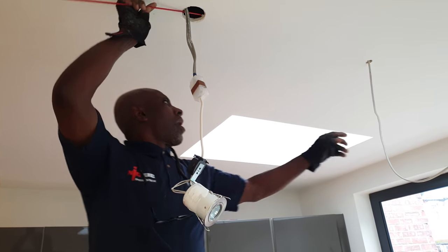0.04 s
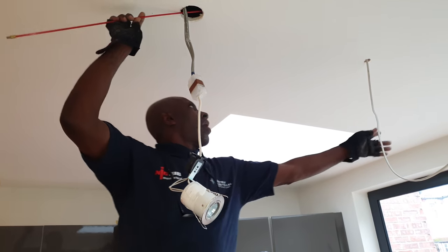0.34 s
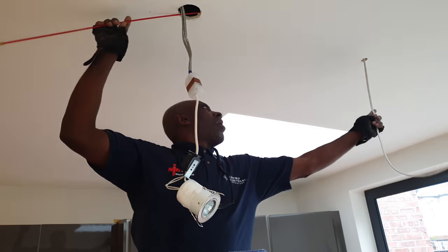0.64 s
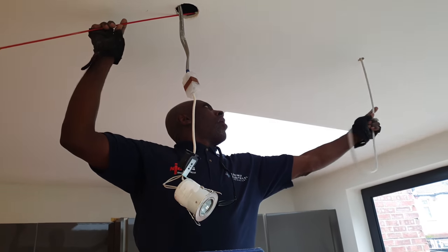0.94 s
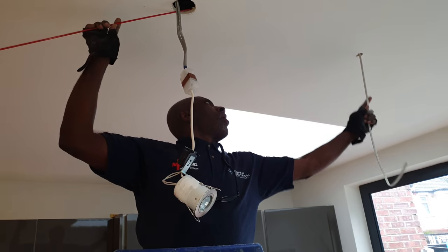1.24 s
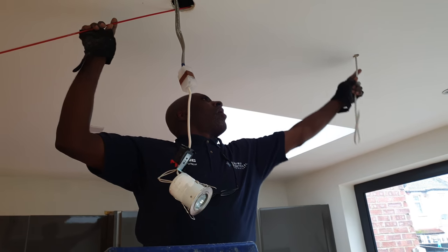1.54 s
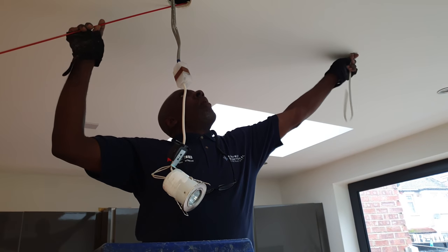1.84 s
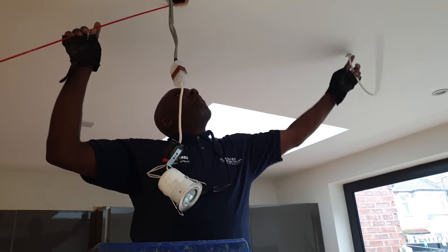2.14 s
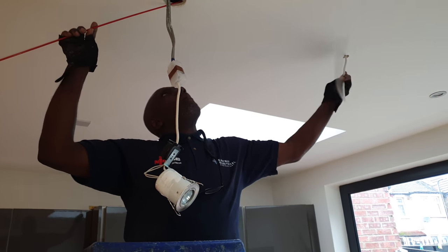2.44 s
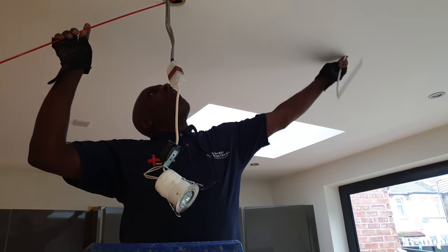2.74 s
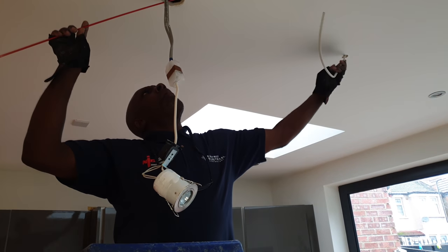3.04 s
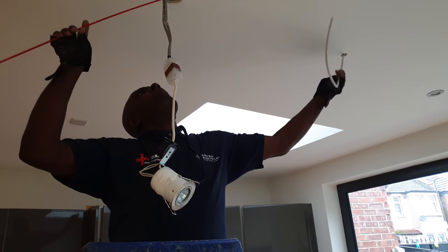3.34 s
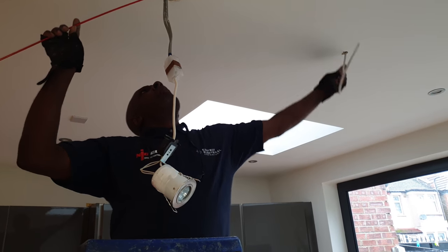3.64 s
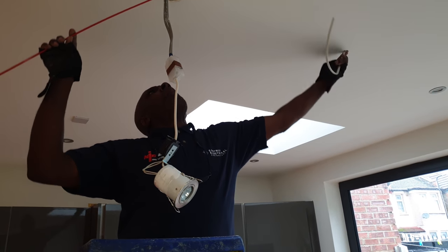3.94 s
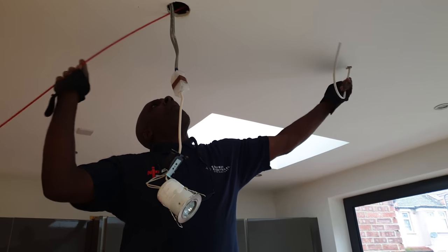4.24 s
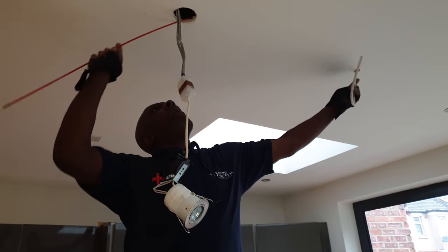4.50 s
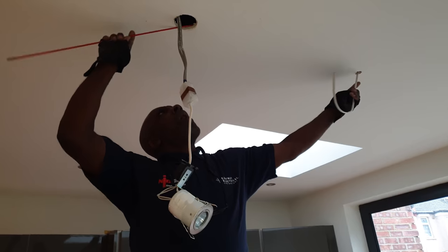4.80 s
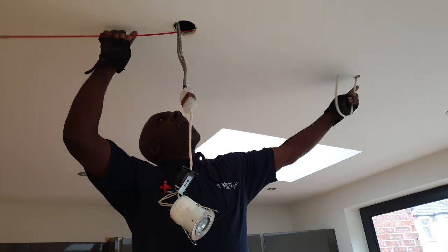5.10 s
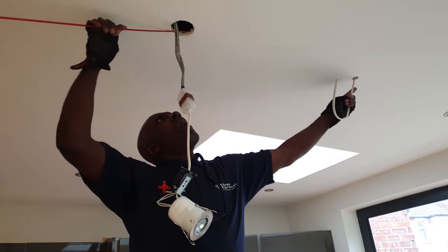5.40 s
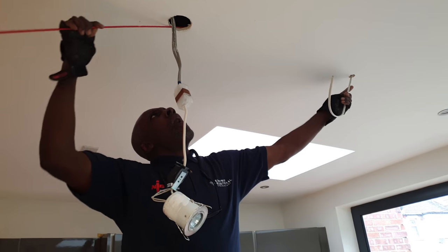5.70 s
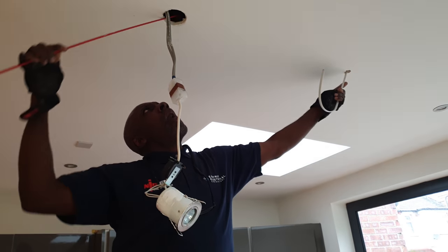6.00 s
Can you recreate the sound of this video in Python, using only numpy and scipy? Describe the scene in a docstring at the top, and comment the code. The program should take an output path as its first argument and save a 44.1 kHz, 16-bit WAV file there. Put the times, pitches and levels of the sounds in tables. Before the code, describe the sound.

A flexible rod fishes cable through a plasterboard ceiling, heard in stereo from a bare kitchen below, with short room ring and faint hiss. At the start the ceiling flexes with a deep double thump and a scrape, and the rod ticks against it at 0.3 seconds. Until about 2.4 seconds there are quiet, rasping strokes, soft bumps and glove rustles. At 2.6 seconds the rod slaps the board with a loud, briefly ringing crack, followed by a hollow knock at 2.9. Around 3.6 seconds come quick snaps over a low thump, then a brush of sleeve and a loud, hard knock at 3.9. A softer bump follows at 4.3 seconds, and the sliding now sounds hollow, from inside the ceiling. The rod scuffs an edge near 4.9 seconds, then light scrapes thin out toward 6 seconds.

```python
"""A long flexible rod fishes a cable through a plasterboard ceiling, heard from the bare kitchen below.
Rod and cable scrape over the boards in tiny slips, catch, and snap free with a crack and a ring.
The board knocks and bumps in its own modes, and the whole ceiling flexes under a push.
The electrician's glove and sleeve rustle. The stereo microphone takes both the direct sound
and the hard room ringing after every blow, over faint air and hiss."""
import sys
import numpy as np
from scipy import signal
from scipy.fft import rfft, irfft
from scipy.io import wavfile
from scipy.ndimage import uniform_filter1d

SR = 44100
rng = np.random.default_rng(int(sys.argv[2]) if len(sys.argv) > 2 else 0)


def digitize_waveform(pressure):
    """Quantize a signal to 16-bit integers and store it at the path in sys.argv[1].

    Rows of a 2-D input are taken as channels; values are limited to [-1, 1].
    """
    field = np.atleast_2d(pressure).T
    bounded = np.clip(field, -1, 1)
    quanta = np.round(bounded * 32767).astype(np.int16)
    wavfile.write(sys.argv[1], SR, quanta)


N = 267246

# slaps of rod and cable: t/s, level/dB, body below 1 kHz/dB, treble at 7 kHz/dB, fizz at 12 kHz/dB,
# ping f/Hz, ping/dB, rod ring/dB, direct sound trim/dB
SNAPS = [(0.001, -44, 4.5, -6.5, 2.5, 975, -11, -12.5, -3.5),
         (0.284, -40, -3, -14, 0, 2717, -7.5, -11, -3.5), (2.43, -71, -8.5, -11, -13.5, 2685, -3, -18.5, 7),
         (2.5936, -23.5, -1.5, 1.5, 0, 1762, -23.5, -5, 0),
         (3.592, -50.5, 10.5, -7, 0, 1520, -22, -17, -14), (3.6215, -30, 4, -11.5, -9.5, 1700, -16, -5, -1),
         (3.6625, -31.5, 8, 7, 12.5, 1350, -18, -12.5, 0.5)]
# hard blows overhead: t/s, level/dB, tilt/(dB/octave), boom/dB, zing/dB, ring/dB, direct sound trim/dB
KNOCKS = [(2.9382, -28.5, -0.26, 1.5, 8.5, -2, -1), (3.908, -24, 1.65, -1, -1.5, -0.5, 2.5)]
# pushes on the ceiling: t/s, level/dB, swell/s
FLEXES = [(0.0, -29, 0.026), (0.085, -26, 0.018), (0.45, -53.5, 0.074), (0.64, -49.5, 0.027),
          (0.862, -50.5, 0.024), (2.55, -43.5, 0.062), (3.598, -31.5, 0.03), (3.665, -25.5, 0.0091)]
# soft bumps of rod and glove: t/s, level/dB, tilt/(dB/octave), f favoured at that spot/Hz, rebound/dB
BUMPS = [(0.291, -44, 5, 352, 0), (0.411, -49, -0.5, 150, -2.5), (0.869, -62, 0, 430, -15),
         (1.266, -59.5, -1, 287, 7.5), (1.44, -52.5, 4.5, 270, -4), (1.52, -54, 3, 332, -1),
         (1.76, -48, -2, 200, -2), (1.937, -54.5, -1, 148, -4), (2.299, -63.5, -0.5, 169, -10.5),
         (2.651, -53.5, 0.5, 116, 0.5), (3.191, -56.5, -2, 158, -8), (3.55, -51, -16, 156, -2.5),
         (3.68, -41.5, -3, 208, -9.5), (3.811, -48.5, 5.5, 160, 1.5), (4.331, -38, -9.5, 154, -9),
         (4.537, -49.5, -4.5, 162, -14), (4.722, -54, 1.5, 257, -4), (5.307, -61, -0.5, 157, 2.5)]
# strokes over the board: t/s, rise/s, length/s, rasp/dB, rumble/dB, zing/dB, swell over the stroke/dB
STROKES = [(0.0, .008, 0.15, -50.5, -49, -61.5, -6.5), (0.781, 0.015, 0.16, -64, -64, -73, -5.5),
           (1.144, 0.027, 0.11, -70, -61.5, -76, 1), (1.257, 0.014, 0.21, -57.5, -57.5, -61, 1),
           (1.502, 0.0038, 0.27, -54.5, -53, -62, 1.5), (1.92, 0.0082, 0.082, -88, -61, -75, 2),
           (2.073, 0.043, 0.2, -71.5, -77, -78.5, 7), (2.387, 0.064, 0.23, -72, -80, -82.5, 14),
           (3.27, 0.019, 0.38, -62.5, -63, -76, 11), (4.325, 0.0034, 0.061, -55, -47.5, -66.5, -2.5),
           (4.517, .03, 0.083, -59, -54.5, -69.5, -0.5), (4.714, .003, 0.21, -57.5, -56.5, -71, 10),
           (5.199, 0.075, 0.09, -71, -76, -73.5, -2), (5.302, .008, .06, -61.5, -69.5, -72.5, 1),
           (5.428, .015, .1, -67.5, -67.5, -68.5, 1.5)]
# sliding heard from inside the ceiling void as the rod goes deeper: t/s, share/1
VOID_SHARE = [(2.3, 0.046), (4.302, 1)]
# the rod catches on an edge: t/s, rise/s, fade/s, level/dB, centre f/Hz, width/octaves
SCUFFS = [(0.575, 0.039, 0.1, -50, 1140, 0.77), (1.51, .004, 0.073, -53, 650, .8),
          (3.44, .01, 0.059, -63, 2014, 0.23), (3.597, 0.002, 0.017, -38, 627, 0.26),
          (4.84, 0.1, 0.057, -50.5, 597, 0.28), (4.921, 0.018, 0.072, -55, 2150, 0.26),
          (5.305, .02, 0.1, -68, 4360, 0.55), (5.43, 0.017, 0.12, -68.5, 4480, 0.45),
          (5.86, 0.12, 0.17, -72.5, 429.4, 0.17)]
# the hand takes a new grip: t/s, swell/s, level/dB
RUSTLES = [(0.468, 0.013, -56.5), (0.58, 0.036, -58), (1.27, 0.11, -70), (1.5, 0.31, -64.5),
           (1.94, 0.028, -69.5), (2.161, 0.068, -73.5), (2.42, 0.17, -67), (2.95, 0.12, -67),
           (3.31, .11, -70), (3.78, 0.059, -50.5), (4.02, 0.041, -63.5), (4.44, 0.082, -69),
           (4.739, .05, -72)]
# modes of the rod and of the plasterboard: f/Hz, level/dB, t60/s
ROD_MODES = [(1394, -9, .42), (1491, -9, .38), (1546, -9, .6), (1800, 5.5, .36), (2649, -13, .5),
             (2980, -12, .45), (3171, -10, .3), (3680, -11, .55), (4474, -15, .5), (5276, -12, .42),
             (5445, -12, .42), (5642, -6, .22), (5670, -8, .25), (6756, -13, .28), (6988, -13, .28)]
BOARD_MODES = [(154.1, 5, 0.18), (225, -15.5, 0.1), (272.5, -8.5, 0.44), (346.7, -6.5, 0.47),
               (429, -8, 0.35), (487, -5.5, 0.5), (591, -14.5, 0.4), (648, -5, 0.45), (698, -5.5, 0.42),
               (808, -6.5, 0.24), (837, -16, .4), (921, -15, 0.46), (1120, -10.5, 0.2), (1388, -11.5, 0.33)]
# spectral shapes: f/Hz, relative level/dB
SNAP_TONE = [(60, -15.5), (350, -16), (650, -4.5), (1050, -4), (1400, 1.5), (1750, -1.5), (2100, -2.5),
             (2900, -0.5), (4000, -2.5), (5200, -3.5), (7000, -2.5), (8300, -10.5), (12000, -14.5),
             (16000, -27)]  # crack of the rod
KNOCK_TONE = [(40, -24.5), (90, -4), (140, 3), (210, 0.5), (400, 0.5), (750, -4.5), (1050, -9),
              (1400, -13.5), (2050, -16), (2700, -19.5), (3600, -26), (5500, -34.5), (10000, -48),
              (16000, -54.5)]  # board, hard contact
BUMP_TONE = [(40, -16), (100, -15), (155, 1.5), (215, -6.5), (280, -3.5), (420, -15), (800, -19.5),
             (1600, -35), (2700, -30.5), (5000, -56.5), (16000, -59)]  # board, soft contact
RUMBLE_TONE = [(30, -23), (100, -6.5), (160, 1.5), (215, -4.5), (280, -3.5), (400, -9), (600, -39.5),
               (1500, -42.5)]  # rubbed board
RASP_TONE = [(200, -29.5), (330, -3), (420, -0.5), (530, -3.5), (670, -4), (800, -2), (930, -8.5),
             (1130, -7), (1350, -7), (1650, -21), (2300, -23), (5000, -60.5)]  # rough plaster
ZING_TONE = [(900, -35), (1650, -21.5), (2100, -10.5), (2450, -2.5), (2700, -1), (3050, -7.5), (3500, -18),
             (6000, -28)]  # band where the board radiates best
HISS_TONE = [(700, -7), (1700, 8.5), (2500, 8.5), (3700, 2.5), (5000, 0), (6000, 2), (7400, -4),
             (8300, -14.5), (9800, -12.5), (11400, -9), (13500, -17), (16000, -22)]  # edge of the hole
VOID_TONE = [(300, 0.5), (520, -4), (700, 0.5), (930, -2.5), (1130, 1), (1380, -7), (1630, -8.5),
             (2000, -2.5), (2600, 1.5), (3400, -3), (4200, 0), (5200, -6), (7000, 3), (10000, -1.5)]  # hollow above the ceiling
RUSTLE_TONE = [(700, -19.5), (2000, -2.5), (4000, -3), (7200, 1), (8300, -5.5), (11400, -2.5),
               (13500, -8.5), (16000, -14)]  # glove and sleeve
AIR_TONE = [(25, -5), (60, 1.5), (160, 1), (280, -9.5), (430, -9), (600, -17.5), (1000, -15), (2000, -20.5),
            (2700, -19), (4000, -27.5), (7400, -19), (8400, -32), (11500, -21.5), (16000, -25.5)]  # room air and microphone hiss
# decay of the kitchen: f/Hz, t60/s
KITCHEN_T60 = [(60, .45), (160, .55), (500, 0.66), (1500, 0.65), (3000, 0.62), (6000, 0.59), (10000, 0.53),
               (16000, 0.21)]
# room sound at the microphone: f/Hz, left-right correlation/1
MIC_CORRELATION = [(60, 0.86), (160, 0.92), (300, 0.81), (640, 0.61), (1300, 0), (16000, 0)]
# balance of the snaps at the microphone: f/Hz, left minus right/dB
SNAP_BALANCE = [(500, -1), (1500, 3), (4500, 5), (8000, 2.5), (12000, 4)]

# thin plasterboard radiates best where its bending waves match the speed of sound
ZING_HZ, ZING_OCTAVES = 2695, 0.17


def rod_snaps(chatter_s=0.0034, ping_t60_s=0.035, spot_db=6, spot_octaves=0.11):
    """The springy rod or cable end slaps the board: a crack with short chatter, a ping, the rod's ring."""
    out, t = np.zeros((2, N)), np.arange(SR) / SR
    for s, db, body_db, treble_db, fizz_db, ping_hz, ping_db, ring_db, direct_db in SNAPS:
        chatter = rng.standard_normal((2, SR)) * np.exp(-t / chatter_s)
        chatter *= amp(direct_db - 13) * pan(6.9) / np.linalg.norm(chatter[0])
        # bright on the straight path to the microphone: walls dull only the reflections
        chatter = colour(chatter, lambda hz: read([(1000, -9.5), (3000, -4.5), (7000, 8)], hz))
        contact = [(800, body_db), (2200, 0.001), (7000, treble_db), (12000, fizz_db)]
        crack = colour(kitchen(direct_db - 17) + chatter, lambda hz:
                       read(SNAP_TONE, hz) + read(contact, hz) + spot_db * bell(hz, ping_hz, spot_octaves))
        ping = amp(ping_db) * unit(ring([(ping_hz, 0, ping_t60_s)]))
        rod = amp(ring_db) * unit(ring(ROD_MODES))
        add(out, s, amp(db) * unit(unit(crack) + ping + rod))
    left = colour(out[:1], lambda hz: read(SNAP_BALANCE, hz) / 2)
    right = colour(out[1:], lambda hz: -read(SNAP_BALANCE, hz) / 2)
    return np.vstack([left, right])


def rod_slides(hiss_db_per_zing_db=1.2):
    """Sliding overhead makes the board rumble and zing, the plaster rasp, the edge of the hole hiss."""
    rumble = pan(-2.8) * friction(RUMBLE_TONE, slips_per_s=400, spread_db=1.8, modes_db=3.0)
    rasp = pan(0.66) * friction(RASP_TONE, slips_per_s=450, spread_db=4.5, modes_db=1.0)
    zing = pan(1.0) * friction(ZING_TONE, slips_per_s=900, spread_db=2.4)
    hiss = pan(0.69) * friction(HISS_TONE, slips_per_s=1600, spread_db=2.7)
    out = np.zeros((2, N))
    for s, rise, length, rasp_db, rumble_db, zing_db, swell_db in STROKES:
        hiss_db = -60 + hiss_db_per_zing_db * (zing_db + 61)  # harder sliding sounds brighter
        rub = rumble * amp(rumble_db) + rasp * amp(rasp_db) + zing * amp(zing_db) + hiss * amp(hiss_db)
        out += rub * stroke(s, rise, length, swell_db)
    hollow = np.interp(np.arange(N) / SR, *np.transpose(VOID_SHARE))
    return (1 - hollow) * out + hollow * colour(out, lambda hz: read(VOID_TONE, hz))


def rod_scuffs(skirt_db=26):
    """A quick rub on an edge: a spray of slips around one resonance, swelling and dying in the room."""
    out, t = np.zeros((2, N)), np.arange(SR) / SR
    for s, rise, fade, db, centre_hz, octaves in SCUFFS:
        slips = rng.standard_normal((1, SR)) * (rng.random(SR) < .04)
        rub = signal.oaconvolve(slips, kitchen(direct_db=3), axes=1)[:, SR // 5:][:, :SR]
        rub = colour(rub, lambda hz:
                     skirt_db * (bell(hz, centre_hz, 2 * octaves) + bell(hz, centre_hz, 8 * octaves)))
        pressure = np.minimum(t / rise, 1) * np.exp(-np.maximum(t - rise, 0) / fade)
        add(out, s, amp(db) * pressure * unit(rub))
    return out


def board_knocks(tick_db=-40, boom_octaves=0.23):
    """Hard blows from inside the void ring the plasterboard; a tiny tick marks the contact."""
    out, t = np.zeros((2, N)), np.arange(SR) / SR
    boom_hz = BOARD_MODES[0][0]
    for s, db, tilt, boom_db, zing_db, ring_db, direct_db in KNOCKS:
        thud = colour(kitchen(direct_db), lambda hz: read(KNOCK_TONE, hz)
                      + tilt * np.log2(hz / 500 + 1) + zing_db * bell(hz, ZING_HZ, ZING_OCTAVES))
        tick = amp(tick_db + 9.4 * tilt) * unit(rng.standard_normal((2, SR)) * np.exp(-t / .001))
        board = amp(ring_db) * unit(ring(BOARD_MODES))
        blow = colour(unit(thud) + board + tick, lambda hz: boom_db * bell(hz, boom_hz, boom_octaves))
        add(out, s, amp(db) * unit(blow))
    return out * pan(-0.47)


def ceiling_flexes(sag_hz=60.5, stiffen_hz_per_db=0.64, shudder_db=-14, hang_s=0.16):
    """The ceiling swings like a drum skin for a few cycles, and shudders on its joists."""
    out, t = np.zeros((2, N)), np.arange(SR) / SR
    joist_tone = [(25, -17.5), (50, 0.5), (100, 1.0), (160, -19.5), (400, -48.5)]  # f/Hz, level/dB
    for s, db, swell in FLEXES:
        pitch_hz = sag_hz + stiffen_hz_per_db * (db + 36)  # a harder push stretches the board
        swing = t / swell * np.exp(1 - t / swell)
        hang = .1 * (1 - np.exp(-t / swell)) * np.exp(-t / hang_s)
        shudder = colour(diffuse(rng.standard_normal((2, SR))), lambda hz: read(joist_tone, hz))
        motion = np.sin(2 * np.pi * pitch_hz * t) + amp(shudder_db) * shudder / rms(shudder)
        add(out, s, amp(db) * pan(-4.5) * (swing + hang) * motion)
    return out


def board_bumps(rebound_s=0.036, ring_db=-4, spot_db=5, spot_octaves=0.53):
    """A soft contact and its rebound wake the board's low modes, most of all those moving at that spot."""
    out = np.zeros((2, N))
    for s, db, tilt, spot_hz, rebound_db in BUMPS:
        for at, level_db in (s, db), (s + rebound_s, db + rebound_db):
            thud = colour(kitchen(direct_db=4),
                          lambda hz: read(BUMP_TONE, hz) + tilt * np.log2(hz / 200 + 1))
            board = amp(ring_db) * unit(ring(BOARD_MODES[:6], tilt - 9))
            blow = colour(unit(thud) + board, lambda hz: spot_db * bell(hz, spot_hz, spot_octaves))
            add(out, at, amp(level_db) * unit(blow))
    return out * pan(-0.79)


def glove_rustles():
    """Glove and sleeve brush along the cable: a fine, bright spray of slips that swells and dies."""
    pressure = sum(amp(db) * stroke(s, swell, swell) for s, swell, db in RUSTLES)
    return pan(.5) * pressure * friction(RUSTLE_TONE, slips_per_s=1700, spread_db=3.5)


def kitchen(direct_db, smooth_bins=90, left_lead_s=0.00039):
    """A click as heard at the microphone: direct sound, left first, and reflections dying band by band."""
    reflections = rng.standard_normal((2, SR)) * rng.random((2, SR)) ** 2
    hz, t, bands = signal.stft(reflections, SR, nperseg=256)
    decay = amp(-60 * t / read(KITCHEN_T60, hz)[:, None])
    tail = signal.istft(bands * decay, SR, nperseg=256)[1][:, :SR]
    spectrum = rfft(diffuse(tail))
    # the many room modes carry about the same energy in every band
    tail = irfft(spectrum / np.sqrt(uniform_filter1d(abs(spectrum) ** 2, smooth_bins, axis=1)), SR)
    tail *= np.minimum(2 - 2 * np.arange(SR) / SR, 1) ** 2
    tail[[0, 1], [0, round(left_lead_s * SR)]] += amp(direct_db - 11.5)
    return tail


def room_tone(level_db=-70):
    """Faint steady air of the kitchen and microphone hiss."""
    air = colour(diffuse(rng.standard_normal((2, N))), lambda hz: read(AIR_TONE, hz))
    return amp(level_db) * air / rms(air)


def friction(tone, slips_per_s, spread_db, modes_db=0):
    """Tiny slips of uneven size, heard across the room; modes_db lifts the board's modes."""
    slips = (rng.random(N) < slips_per_s / SR) * rng.choice([-1, 1], N)
    sizes = amp(spread_db * np.minimum(rng.exponential(1, N), 4))
    rub = signal.oaconvolve((slips * sizes)[None], kitchen(direct_db=1.4), axes=1)[:, :N]
    rub = colour(rub, lambda hz: read(tone, hz)
                 + modes_db * sum(np.exp(-((hz - mode[0]) / 14) ** 2) for mode in BOARD_MODES))
    return rub / rms(rub)


def stroke(s, rise, length, swell_db=0, release_db_per_s=106.5):
    """Envelope of one rub: it rises, holds while swelling or easing, and dies away with the room."""
    t = np.arange(N) / SR - s
    held_db = swell_db * (np.clip(t / length, 0, 1) - .5)
    return np.clip(t / rise, 0, 1) * amp(held_db - release_db_per_s * np.maximum(t - length, 0))


def ring(modes, tilt=0, attack_s=0.00067):
    """Decaying modes; the higher ones reach left and right out of step and beat against neighbours."""
    t, out = np.arange(SR) / SR, np.zeros((2, SR))
    for hz, db, t60 in modes:
        apart = np.arccos(np.clip(read(MIC_CORRELATION, hz), -1, 1)) * rng.choice([-1, 1])
        phase = 2 * np.pi * rng.random() + np.array([[0], [apart]])
        neighbour_hz = hz + rng.uniform(-20, 27, (2, 1))
        neighbour = 0.43 * min(hz / 1000, 2) * np.sin(2 * np.pi * (neighbour_hz * t + rng.random((2, 1))))
        envelope = amp(db + tilt * np.log2(hz / 500) - 60 * t / t60)
        out += envelope * (np.sin(2 * np.pi * hz * t + phase) + neighbour)
    return out * (1 - np.exp(-t / attack_s))


def diffuse(x):
    """Long waves reach both sides of the microphone alike, short ones do not."""
    left, other = rfft(x)
    same = np.clip(read(MIC_CORRELATION, np.fft.rfftfreq(x.shape[1], 1 / SR)), -1, 1)
    right = same * left + np.sqrt(1 - same ** 2) * other
    return irfft(np.array([left, right]), x.shape[1])


def colour(x, gain_db, size=4096):
    """Causal filter whose gain in dB is a function of frequency."""
    cepstrum = irfft(np.log(amp(gain_db(np.fft.rfftfreq(size, 1 / SR)))))
    cepstrum[1:size // 2] *= 2
    cepstrum[size // 2 + 1:] = 0
    impulse = irfft(np.exp(rfft(cepstrum)))
    return signal.oaconvolve(x, impulse[None], axes=1)[:, :x.shape[1]]


def read(points, hz):
    """Reads a table of f/Hz, value on a log-frequency axis."""
    f, value = np.transpose(points)
    return np.interp(np.log(hz + 1), np.log(f + 1), value)


def bell(hz, centre_hz, octaves):
    """A bump of height 1 on a log-frequency axis."""
    return np.exp(-(np.log2((hz + 1) / centre_hz) / octaves) ** 2)


def amp(db):
    """Decibels to gain."""
    return 10 ** (np.asarray(db) / 20)


def rms(x):
    """Root mean square."""
    return np.sqrt(np.mean(x ** 2) + 1e-24)


def unit(blow):
    """Scales a blow to rms 1 over its first tenth of a second."""
    return blow / rms(blow[:, :SR // 10])


def pan(db):
    """Stereo gains for a left-minus-right level difference."""
    return amp(np.array([[db / 2], [-db / 2]]))


def add(mix, s, sound):
    """Mixes a stereo sound in at time s."""
    part = mix[:, max(round(s * SR), 0):][:, :sound.shape[1]]
    part += sound[:, :part.shape[1]]


def scene():
    """Everything that reaches the microphone under the ceiling."""
    blows = rod_snaps() + board_knocks() + board_bumps() + ceiling_flexes()
    return blows + rod_scuffs() + rod_slides() + glove_rustles() + room_tone()


def record(dry, bass_cut_hz=30, top_hz=16050):
    """The recorder's bass cut and band limit."""
    cut = signal.sosfilt(signal.butter(2, bass_cut_hz, "highpass", fs=SR, output="sos"), dry)
    lowpass = signal.firwin(401, top_hz, window=("kaiser", 8), fs=SR)
    return signal.oaconvolve(cut, lowpass[None], "same")


dry = scene()
out = record(dry)
digitize_waveform(out)
```